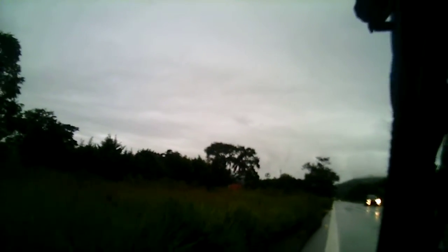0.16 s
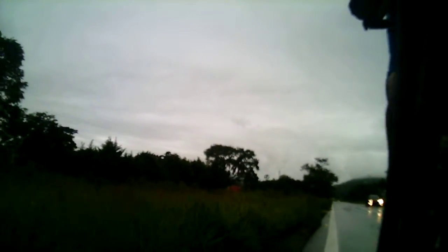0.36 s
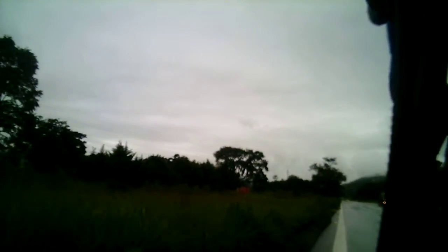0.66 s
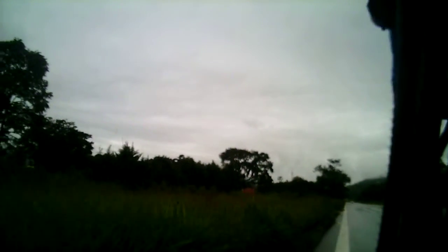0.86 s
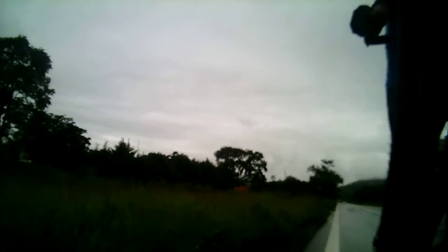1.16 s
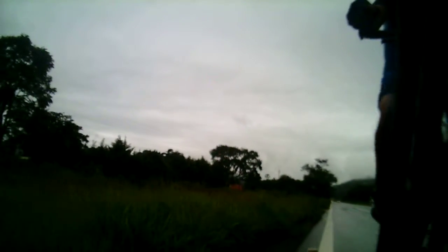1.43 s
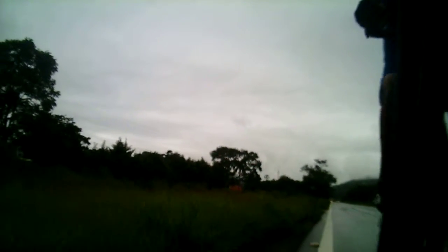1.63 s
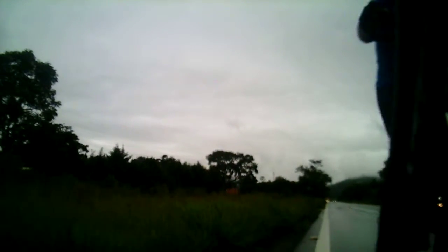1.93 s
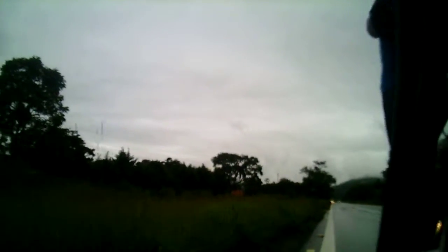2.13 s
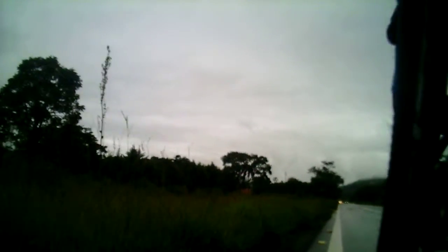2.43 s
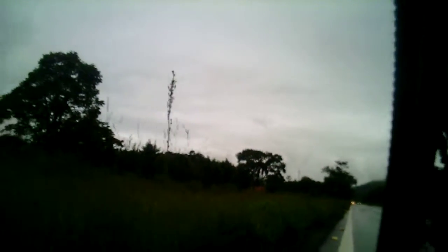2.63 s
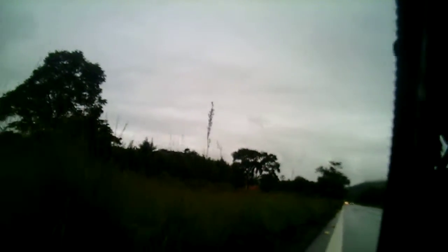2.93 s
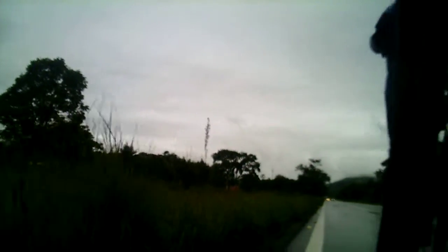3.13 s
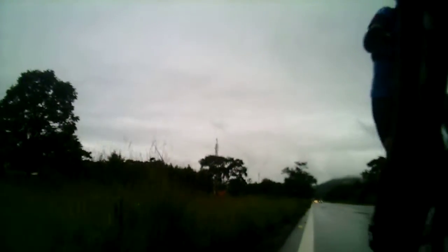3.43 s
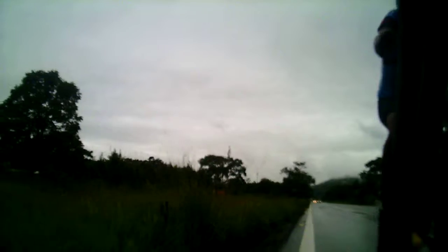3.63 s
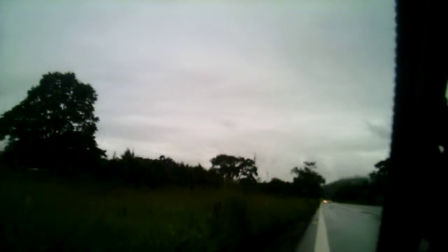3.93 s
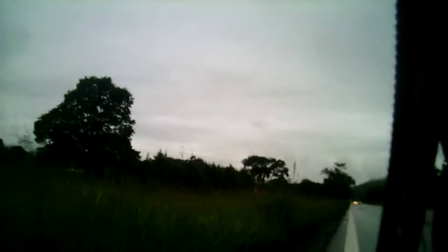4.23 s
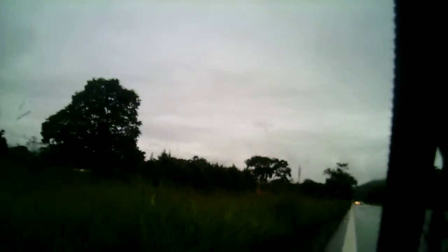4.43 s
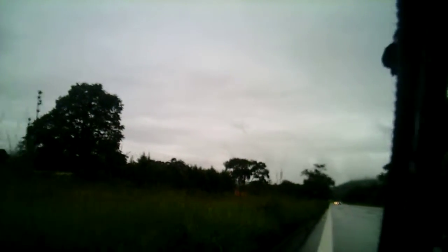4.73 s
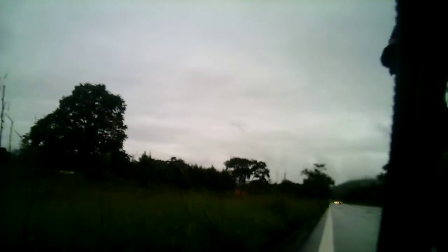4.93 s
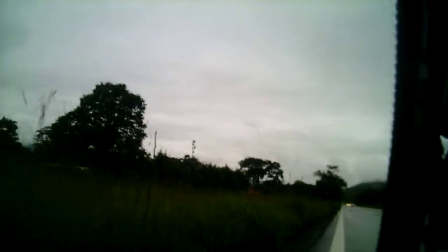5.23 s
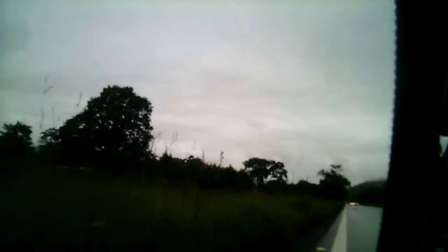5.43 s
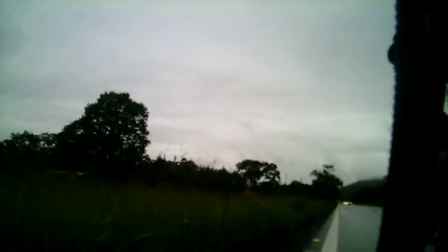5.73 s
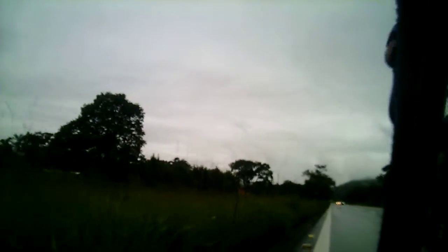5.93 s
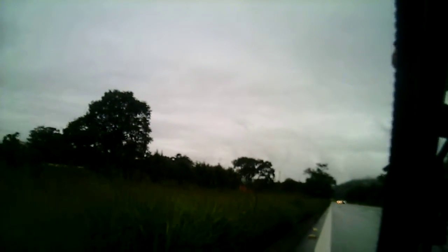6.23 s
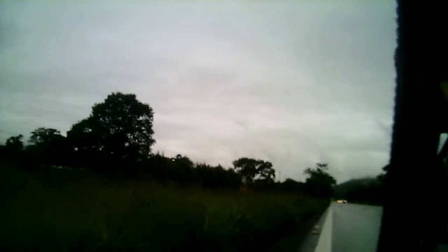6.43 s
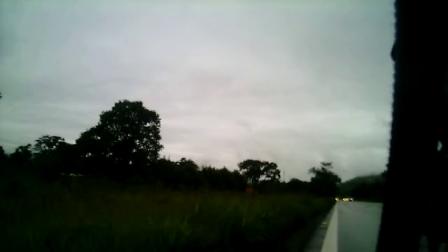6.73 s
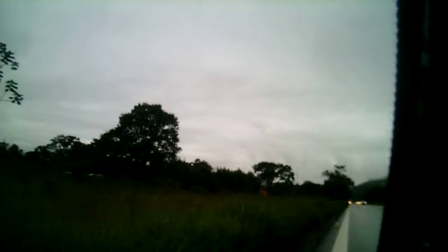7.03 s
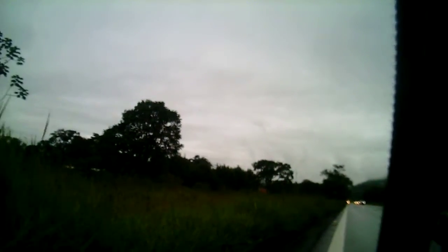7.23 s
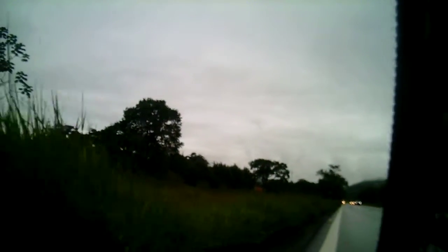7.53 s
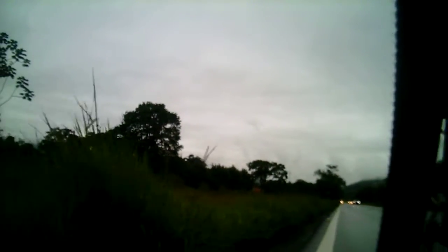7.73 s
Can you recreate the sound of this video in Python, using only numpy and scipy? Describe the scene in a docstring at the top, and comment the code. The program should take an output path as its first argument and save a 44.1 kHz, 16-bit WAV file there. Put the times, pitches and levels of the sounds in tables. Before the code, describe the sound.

Close, irregular ticks of rain run over the low rumble of bicycle tyres on a wet country road. The drive hums and faintly sizzles in uneven surges as the rider pedals, and bumps thud softly through the bike. A short metallic ping comes first, then a hard, slightly distorted knock from the mount and a lighter one after it. The sound is dry and rather dull, picked up on the bicycle itself.

```python
"""A low hum and a wet sizzle, swelling with each push on the pedals, over the rumble of tyres:
a bicycle on a wet country road, heard from a small camera fixed to its frame.
Raindrops tick on the case, right at the microphone. Bumps thud up through the frame, grit pings
once off the metal, and the camera mount knocks, once hard enough to overload the amplifier."""
import sys
import numpy as np
from scipy import signal
from scipy.fft import rfft, irfft, next_fast_len
from scipy.io import wavfile

SR = 44100
rng = np.random.default_rng(int(sys.argv[2]) if len(sys.argv) > 2 else 0)


def file_out(sig):
    """Save sig as 16-bit WAV at sys.argv[1]."""
    # one column per channel
    cols = np.atleast_2d(sig).T
    # limit, then scale
    lim = np.clip(cols, -1, 1)
    pcm = np.round(lim * 32767).astype(np.int16)
    wavfile.write(sys.argv[1], SR, pcm)


N = 347067

# Pedal pushes and shorter tugs. Each row: start in seconds, hold in seconds, relative hum level in dB.
PEDAL_PUSHES = [(.02, 0.038, -37.5), (.2, 0.04, -31.5), (.43, 0.032, -31), (.57, 0.14, -28.5),
                (.84, 0.036, -35), (1.23, 0.066, -27.5), (1.38, .11, -29.5), (1.82, 0.15, -29.3),
                (2.14, 0.12, -32), (2.48, .08, -30.5), (2.64, 0.15, -35.5), (3.07, .26, -27),
                (3.47, .05, -37), (3.69, 0.067, -29.5), (4.04, 0.039, -36.5), (4.27, .28, -34),
                (4.85, 0.058, -31.5), (5.46, 0.11, -26.5), (5.65, .06, -30), (6.03, 0.32, -31.5),
                (6.56, 0.37, -30), (7.24, 0.039, -30), (7.49, .13, -35), (7.8, .07, -26)]
# The drive's hum follows the riding speed. Each row: time in seconds, pitch in Hz.
HUM_PITCH = [(0.0, 93.5), (0.79, 88.86), (0.99, 96), (1.14, 90.05), (1.73, 96.36), (1.8, 92.0), (2.8, 94.9),
             (2.87, 92.6), (3.4, 98.35), (6.49, 101.1), (6.51, 99.16), (7.87, 97.64)]
# Partials of the hum. Each row: multiple of the pitch, relative level in dB.
HUM_PARTIALS = [(1, -1), (2, -13), (3, -31), (4, -24)]
# Colour of the wet drive's sizzle. Each row: frequency in Hz, relative noise density in dB.
SIZZLE_SPECTRUM = [(500, -15.5), (1500, -1), (2700, 0), (3500, -10.5), (4150, 4), (4500, -4.5), (4900, -5),
                   (5300, -11), (7000, -27)]
# Colour of the tyre rumble. Each row: frequency in Hz, relative noise density in dB.
RUMBLE_SPECTRUM = [(20, -14), (42, -21), (62, 1.5), (100, -0.5), (140, -4), (200, -0.5), (280, -4.5),
                   (380, -7), (540, -15.5), (1000, -19), (1500, -24), (1850, -36.5), (2700, -33.5),
                   (5500, -70.5)]
# Roughness of the road. Each row: time in seconds, relative rumble level in dB.
ROAD_ROUGHNESS = [(0.0, -42.5), (0.57, -44), (0.9, -45), (1.44, -42.5), (2.24, -44), (2.5, -41),
                  (2.89, -43.5), (3.22, -40.5), (3.7, -44.5), (5.44, -40), (5.63, -39), (5.79, -40),
                  (6.2, -42.5), (6.93, -42), (7.04, -43), (7.87, -43)]
# Frame and mount, stirred by the road. Each row: frequency in Hz, width in Hz, relative level in dB.
FRAME_RESONANCES = [(237.5, 8.8, -2), (771.4, 58, -10.5), (1224, 75, -10.5), (1330, 44, -19.5)]
# The wall of the camera's case. Each row: frequency in Hz, relative level in dB, t60 in seconds.
CASE_MODES = [(1355, 1.5, 0.031), (820, -28, 0.0066), (1273, -7.5, 0.062), (1464, -1.5, 0.018),
              (1598, -10.5, 0.031), (2070, -6.5, 0.027), (2130, -6.5, 0.016), (2563, -5, 0.02),
              (2701, -2.5, 0.019), (3128, -8, 0.011), (3226, -10.5, 0.012), (4500, -21, 0.004),
              (4590, -17, 0.016), (5670, -24, 0.0095)]
# The heaviest raindrops. Each row: start in seconds, relative peak in dB, brightness in dB per octave.
HEAVY_DROPS = [(.0226, -30.5, -17), (.36, -29, -2), (.4703, -28, -9), (.8196, -24, 1), (.9561, -31.5, -6.5),
               (.9829, -31.5, 6), (1.1478, -24.5, 0), (1.3801, -28, -6), (1.8034, -30.5, -5),
               (1.8397, -28.5, 2.5), (1.9993, -29.5, -2), (2.3018, -26.5, -4), (2.3543, -28.5, -12),
               (2.4007, -33, -14), (2.4149, -23, -3), (2.5042, -27.5, -2), (2.6252, -28, 3),
               (2.9621, -26, 0), (3.0261, -26.5, -11), (3.179, -27.5, -8), (3.2292, -26, -5),
               (3.2785, -32.5, -2), (3.6146, -31.5, 1.5), (3.7301, -27, -3), (3.843, -25.5, -0.5),
               (4.0686, -29.5, 3), (4.2242, -27, -4), (4.2689, -26, -3), (4.5264, -28, 7),
               (4.5887, -29.5, -25), (4.7855, -27, -5), (4.8469, -31, -3), (4.8928, -33, -3),
               (5.0655, -28.5, -9), (5.1049, -26.5, -13), (5.1946, -31.5, 1), (5.2337, -27.5, 2),
               (5.3161, -30, -5), (5.3484, -26.5, 2), (5.757, -28.5, .5), (5.873, -28.5, 5),
               (5.9381, -30.5, -13), (5.9747, -19, -4), (5.998, -23.5, -6), (6.2902, -27.5, 3),
               (6.8216, -28, 2), (6.8891, -30.5, -13), (6.9275, -26.5, 0.5), (7.0833, -28, -11),
               (7.24, -29, 2.5), (7.3412, -29.5, 2), (7.4095, -29, -7), (7.4688, -26.5, -.5),
               (7.5739, -28.5, 1.5), (7.6662, -25.5, -1)]
# Knocks and their bounces. Each row: start in seconds, relative peak in dB, brightness in dB per octave.
MOUNT_KNOCKS = [(.3513, -29, -21), (.3928, -23.5, -3), (.436, -29.5, -13), (1.4228, -22.5, -1.5),
                (2.8613, -25, -4), (4.1412, -28.5, -8), (4.8015, -27.5, -1), (5.5932, 2.5, 2),
                (5.5957, -2, 5), (5.6004, -4.5, -7), (6.1037, -14.5, 0.5), (6.1615, -30, -22)]
# The stiff camera mount. Each row: frequency in Hz, relative level in dB, t60 in seconds.
MOUNT_MODES = [(1152, 0.5, 0.039), (484, -13, 0.022), (772, -5, 0.032), (863, -12.5, 0.027),
               (1323, -2, 0.041), (1464, 0, 0.01), (1560, -20, .012), (2043, 0, 0.014), (2184, -12, 0.048),
               (2460, -10.5, .014), (2708, -11, 0.019), (3390, -15.5, 0.014), (4296, -18, 0.014),
               (4520, -20, 0.024), (5300, -21, 0.0046)]
# The mount's arm. Each row: frequency in Hz, width in Hz, relative level in dB.
ARM_RESONANCES = [(751, 5.6, -5), (775, 14, -10), (877, 25, -7), (2890, 16, -9)]
# Bumps in the road. Each row: start in seconds, peak in dB, brightness in dB per octave.
ROAD_BUMPS = [(.438, -23.5, -9), (.975, -29.5, 2), (1.806, -25.5, -6), (2.860, -25.5, -2),
              (3.59, -30.5, -6.5), (4.788, -26, 22), (4.80, -28, -8), (5.596, -19, 0), (5.995, -32, 6),
              (7.582, -27, -1.5)]
# Low modes of the frame. Each row: frequency in Hz, relative level in dB, t60 in seconds.
FRAME_MODES = [(93, -9.5, 0.13), (170, -11.5, 0.084), (235, -5.5, 0.077), (341, -1, 0.055),
               (443, -5.5, 0.061)]
# Grit hitting metal. Each row: start in seconds, peak in dB, brightness in dB per octave.
GRIT_HITS = [(3.4628, -13.5, -5)]
# The metal it hits. Each row: frequency in Hz, relative level in dB, t60 in seconds.
METAL_MODES = [(2127, -1, 0.042), (790, -14, 0.034), (1090, -18, 0.075), (1300, -9.5, 0.015),
               (1580, -9, .018), (2062, -1.5, 0.028), (2750, -17.5, 0.017), (4670, -28, .012)]

SLACK_DB = -39.5  # relative hum level between pushes


def from_db(db):
    """Decibels to gain."""
    return 10 ** (np.asarray(db) / 20)


def rms_one(x):
    """Scale to unit power."""
    return x / np.sqrt(np.mean(x ** 2) + 1e-20)


def in_time(rows):
    """Read a curve of (seconds, value) rows at every sample."""
    return np.interp(np.arange(N) / SR, *np.transpose(rows))


def drift(rate_hz):
    """A smooth random wander with a spread of about 1, mostly slower than rate_hz."""
    step, settle = 40, 2000
    pole = np.exp(-2 * np.pi * rate_hz * step / SR)
    white = rng.standard_normal(N // step + settle + 2)
    slow = signal.lfilter([1], [1, -2 * pole, pole * pole], white)[settle:]
    return np.interp(np.arange(N) / step, np.arange(len(slow)), rms_one(slow))


def noise(spectrum):
    """Noise of the given colour, at unit power."""
    hz, level_db = np.transpose(spectrum)
    size = next_fast_len(N)
    bin_hz = np.maximum(np.fft.rfftfreq(size, 1 / SR), 1)
    gain = from_db(np.interp(np.log(bin_hz), np.log(hz), level_db))
    return rms_one(irfft(rfft(rng.standard_normal(size)) * gain, size)[:N])


def resonate(x, hz, width_hz):
    """A two-pole resonance."""
    pole = np.exp(-np.pi * width_hz / SR)
    return signal.lfilter([1, 0, -1], [1, -2 * pole * np.cos(2 * np.pi * hz / SR), pole * pole], x)


def ring(force, hz, t60):
    """A unit click sets a sine of height 1 ringing; it falls 60 dB in t60 seconds."""
    pole, angle = from_db(-60 / (t60 * SR)), 2 * np.pi * hz / SR
    return signal.lfilter([0, np.sin(angle)], [1, -2 * pole * np.cos(angle), pole * pole], force + 1e-18)


def strikes(events, modes, contact_s, scrape, scatter_db, detune):
    """Each blow is a click plus a brief scrape, and stirs every mode with a strength of its own."""
    t = np.arange(SR // 4) / SR
    track = np.zeros(N + len(t))
    contact = rms_one(t * np.exp(-t / contact_s)) / np.sqrt(len(t))
    hz, mode_db, t60 = np.transpose(modes)
    octaves_up = np.log2(np.maximum(hz / hz[0], 1))  # brightness tilts only modes above the first row's
    for start_s, peak_db, brightness_db in events:
        force = scrape * rng.standard_normal(len(t)) * contact
        force[0] += 1  # the click
        gains = from_db(mode_db + brightness_db * octaves_up + scatter_db * rng.standard_normal(len(hz)))
        pitches = hz * (1 + detune * rng.standard_normal(len(hz)))
        blow = sum((-1) ** k * gains[k] * ring(force, pitches[k], t60[k]) for k in range(len(hz)))
        start = round(start_s * SR)
        track[start:start + len(t)] += from_db(peak_db) * blow / np.abs(blow).max()
    return track[:N]


def pedal_load(attack_db_per_s=281.5, release_db_per_s=189.5, slack_swing_db=4, shudder_db=1.5):
    """Load on the drive in dB, never quite even: each push rises, holds and falls back to slack."""
    t = np.arange(N) / SR
    power = from_db(SLACK_DB + slack_swing_db * drift(6)) ** 2
    for start_s, hold_s, level_db in PEDAL_PUSHES:
        attack_db = attack_db_per_s * np.maximum(start_s - t, 0)
        release_db = release_db_per_s * np.maximum(t - start_s - hold_s, 0)
        power += from_db(level_db - attack_db - release_db) ** 2
    return 10 * np.log10(power) + shudder_db * drift(20)


def drive(hum_gain_db=-1.5, sizzle_db=-66, crackle_db=4.5, flutter_db=1.5, waver=0.016):
    """The drive hums under load; wet friction grows with it and sizzles in step with the hum's cycle."""
    load_db = pedal_load()
    pitch_hz = in_time(HUM_PITCH) * (1 + waver * drift(25))
    phase = 2 * np.pi * np.cumsum(pitch_hz) / SR
    hum = 0
    for multiple, level_db in HUM_PARTIALS:
        overtone_wander_db = 0.5 * (multiple > 1) * drift(6.4)
        hum += np.sqrt(2) * from_db(level_db + overtone_wander_db) * np.cos(multiple * phase)
    pulses = np.exp(0.14 * (np.cos(phase) + np.cos(2 * phase)))
    spurts = rms_one(pulses * from_db(crackle_db * drift(150)))
    friction_db = 1.007 * (load_db - SLACK_DB)
    sizzle = noise(SIZZLE_SPECTRUM) * spurts * from_db(sizzle_db + friction_db + flutter_db * drift(14))
    return hum * from_db(load_db + hum_gain_db) + sizzle


def tyres(rumble_gain_db=2, lumpy_db=2.37, grain_db=3.5):
    """Road texture rumbles up through the tyres and shakes the frame's resonances unevenly."""
    rumble = noise(RUMBLE_SPECTRUM) * from_db(rumble_gain_db + lumpy_db * drift(40))
    shaking = from_db(grain_db * drift(47))
    frame = 0
    for hz, width_hz, level_db in FRAME_RESONANCES:
        mode = resonate(rng.standard_normal(N) * shaking, hz, width_hz)
        frame += from_db(level_db) * rms_one(resonate(mode, hz, hz / 2))  # trims the mode's skirts
    return from_db(in_time(ROAD_ROUGHNESS)) * (rumble + frame)


def drizzle(per_s=70, level_db=-53.5, spread_db=7.5, dull_db_per_octave=8.5):
    """Fine droplets patter on the case, a soft bed under the clear drops."""
    touches = (rng.random(N) < per_s / SR) * from_db(spread_db * rng.uniform(-1.4, 1, N))
    patter = 0
    for hz, mode_db, t60 in CASE_MODES:
        gain = from_db(mode_db - dull_db_per_octave * np.log2(hz / CASE_MODES[0][0]))
        patter += gain * ring(touches * rng.standard_normal(N), hz, t60)
    return from_db(level_db) * rms_one(patter)


def raindrops(light_per_s=9):
    """Heavy drops, and a steady fall of lighter ones, ring the case's wall right at the microphone."""
    jitter, size, colour = rng.uniform(-0.8, 1, (int(light_per_s * N / SR), 3)).T
    start_s = (np.arange(len(jitter)) + (1 + jitter) / 2) / light_per_s
    peak_db, brightness_db = -33.5 + 4 * size, -4 + 5.5 * colour
    drops = [*HEAVY_DROPS, *zip(start_s, peak_db, brightness_db)]
    ticks = strikes(drops, CASE_MODES, contact_s=0.00055, scrape=0.76, scatter_db=3, detune=0.012)
    return from_db(0.25) * ticks


def mount_knocks(crack_gain_db=2, arm_gain_db=8):
    """A knock cracks through the mount's stiff modes and leaves its arm ringing faintly."""
    crack = strikes(MOUNT_KNOCKS, MOUNT_MODES,
                    contact_s=0.00011, scrape=0.16, scatter_db=1.75, detune=0.0022)
    arm = sum(from_db(level_db) * np.pi * width_hz / SR * resonate(crack, hz, width_hz)
              for hz, width_hz, level_db in ARM_RESONANCES)
    return from_db(crack_gain_db) * (crack + from_db(arm_gain_db) * arm)


def road_bumps():
    """Bumps thud up to the camera through the frame's low modes."""
    return strikes(ROAD_BUMPS, FRAME_MODES, contact_s=0.0013, scrape=0.44, scatter_db=1.5, detune=0.019)


def grit_ping():
    """A bit of grit strikes the metal and rings it briefly."""
    return strikes(GRIT_HITS, METAL_MODES, contact_s=0.0012, scrape=0.63, scatter_db=1, detune=0.002)


def scene():
    """Close and in mono: all of it reaches the microphone through frame and case, with no room sound."""
    ride = drive() + tyres() + drizzle() + raindrops() + mount_knocks() + road_bumps() + grit_ping()
    return ride[None]


def record(dry, microphone_top_hz=5477, ceiling=0.72, cutoff_hz=16100):
    """The camera's microphone is dull, its amplifier clips on the hardest knock, and the top is cut."""
    dull = signal.sosfilt(signal.butter(16, microphone_top_hz, fs=SR, output="sos"), dry)
    clipped = np.clip(dull, -ceiling, ceiling)
    return signal.sosfilt(signal.ellip(10, 0.1, 80, cutoff_hz, fs=SR, output="sos"), clipped)


dry = scene()
out = record(dry)
file_out(out)
```